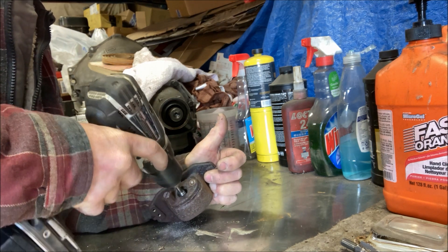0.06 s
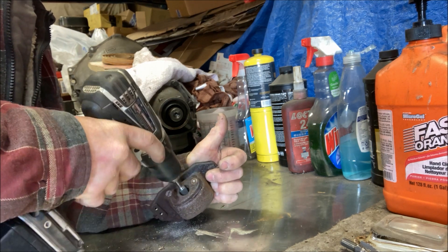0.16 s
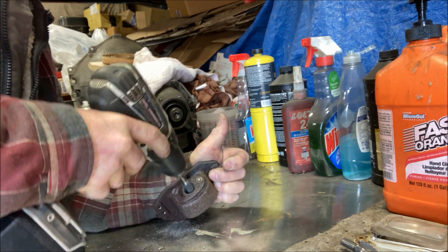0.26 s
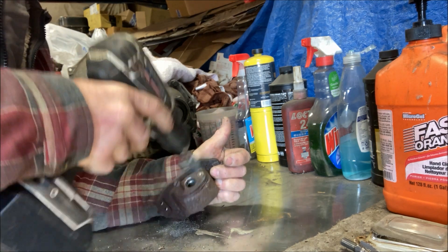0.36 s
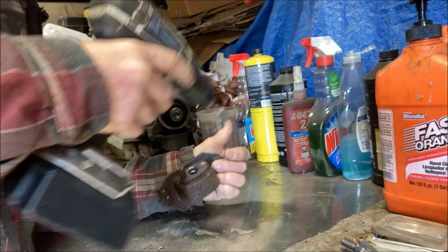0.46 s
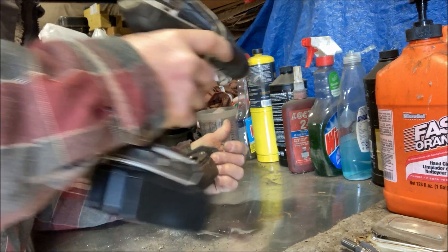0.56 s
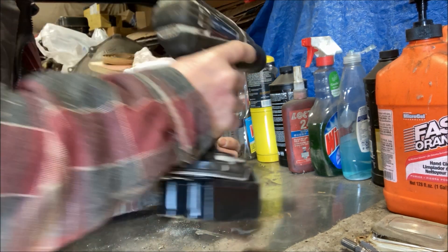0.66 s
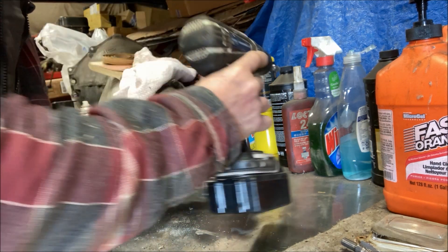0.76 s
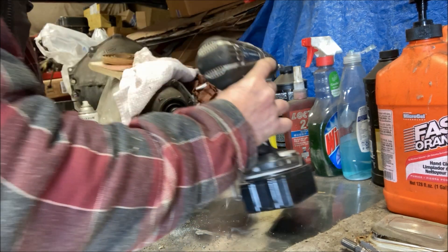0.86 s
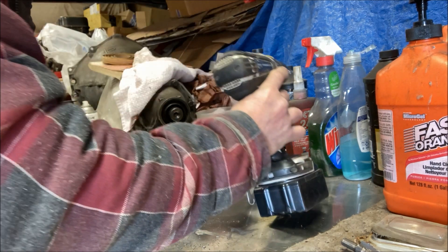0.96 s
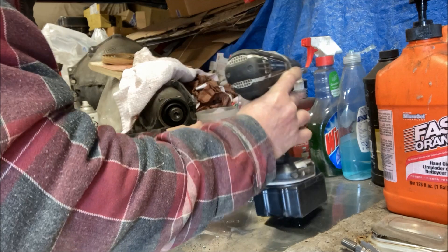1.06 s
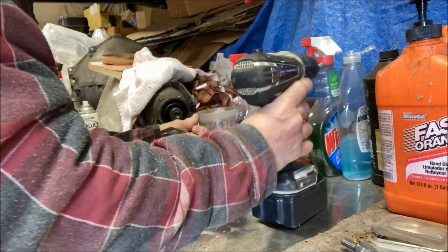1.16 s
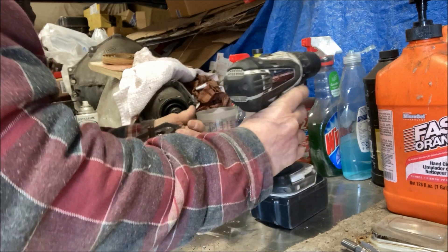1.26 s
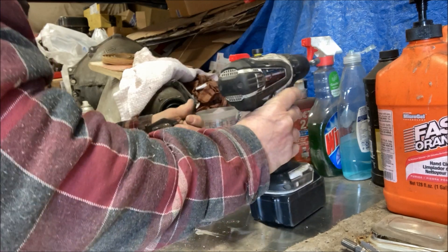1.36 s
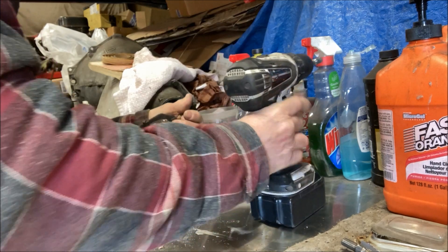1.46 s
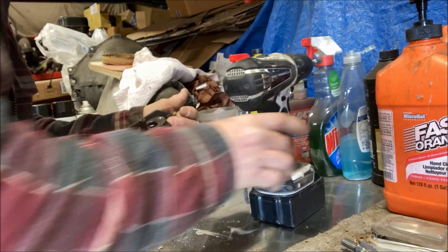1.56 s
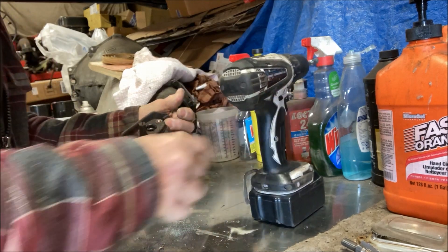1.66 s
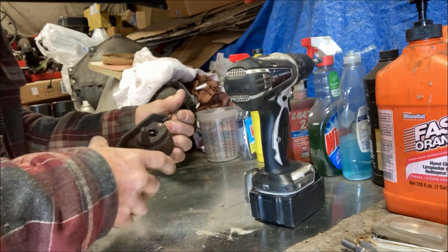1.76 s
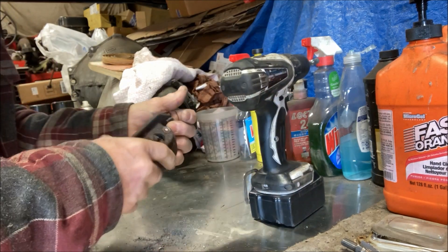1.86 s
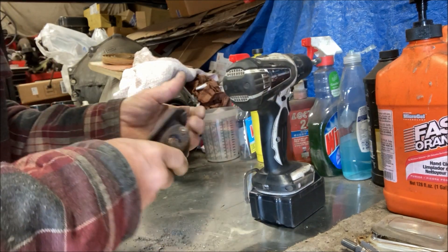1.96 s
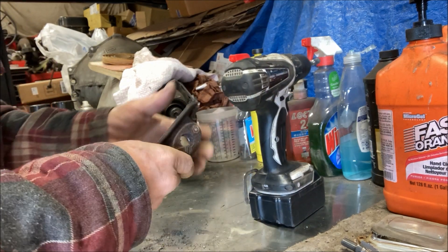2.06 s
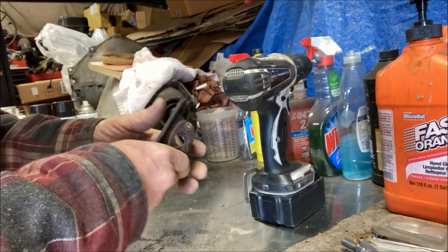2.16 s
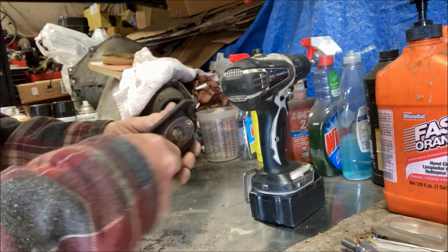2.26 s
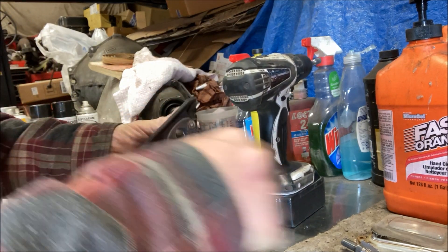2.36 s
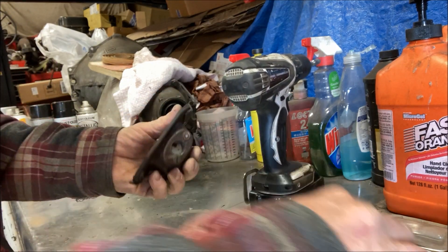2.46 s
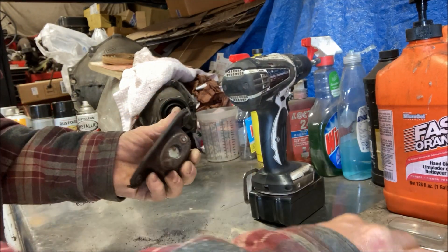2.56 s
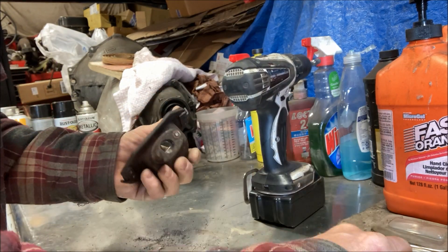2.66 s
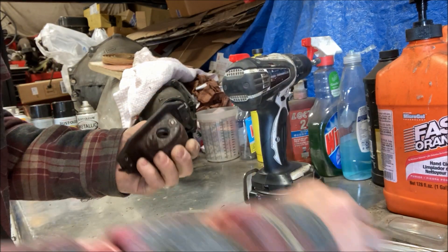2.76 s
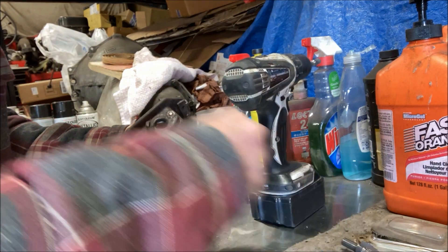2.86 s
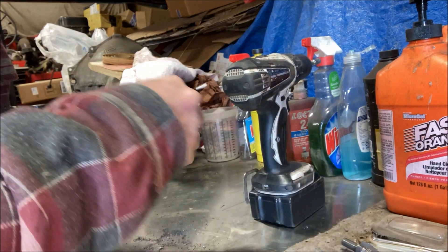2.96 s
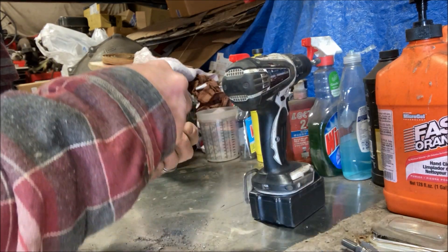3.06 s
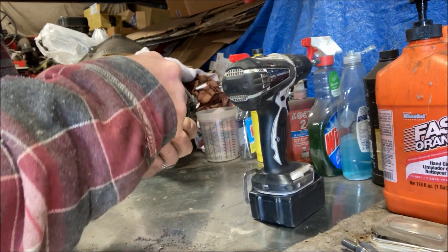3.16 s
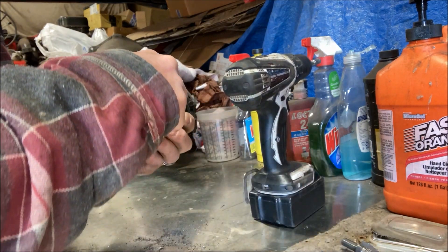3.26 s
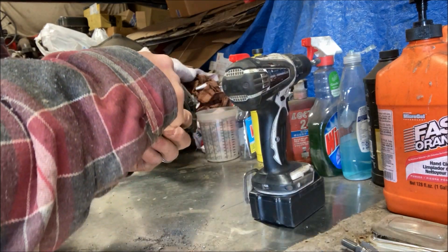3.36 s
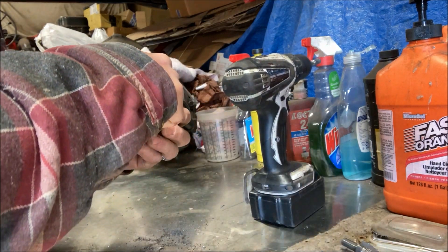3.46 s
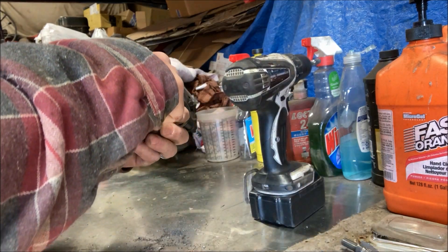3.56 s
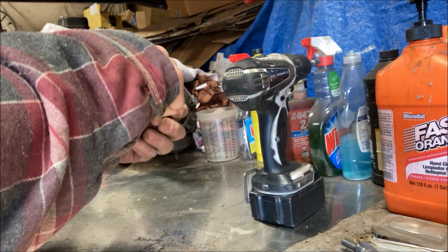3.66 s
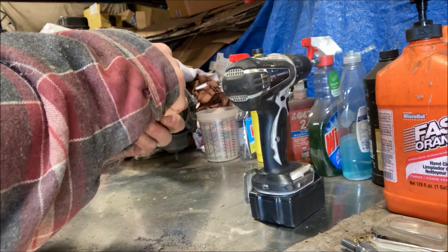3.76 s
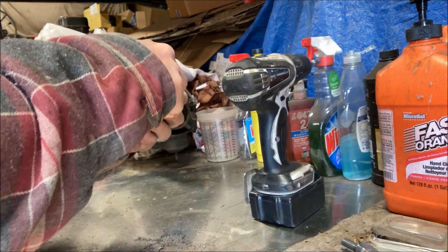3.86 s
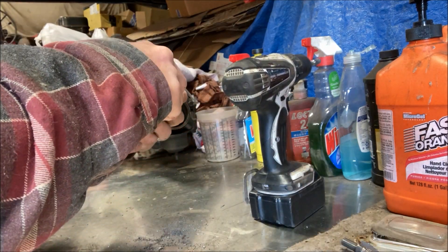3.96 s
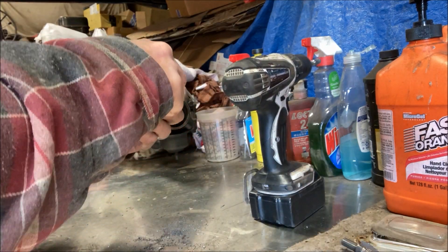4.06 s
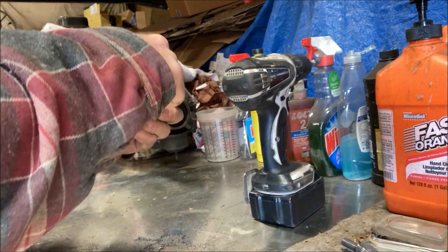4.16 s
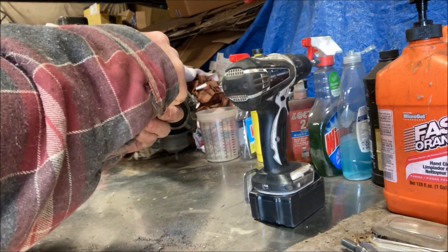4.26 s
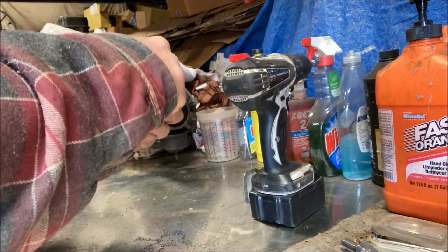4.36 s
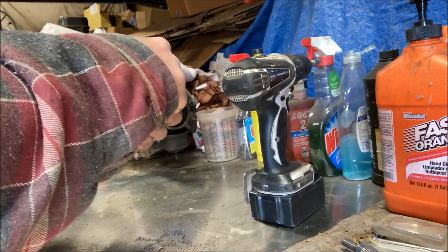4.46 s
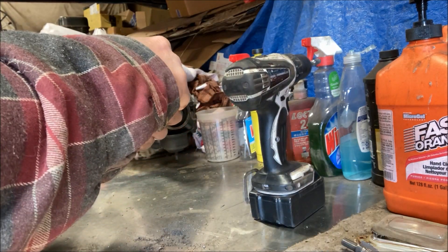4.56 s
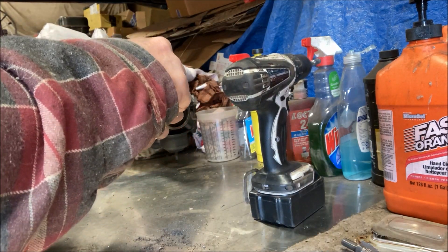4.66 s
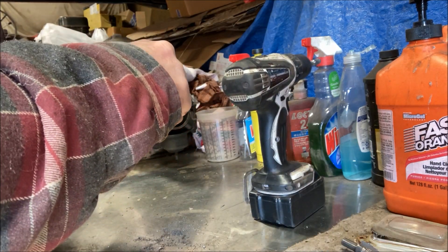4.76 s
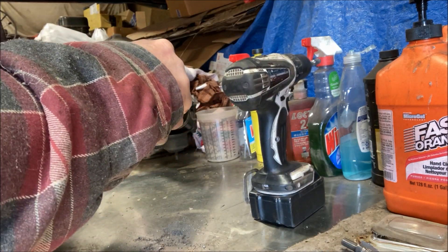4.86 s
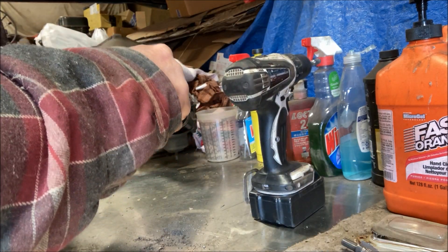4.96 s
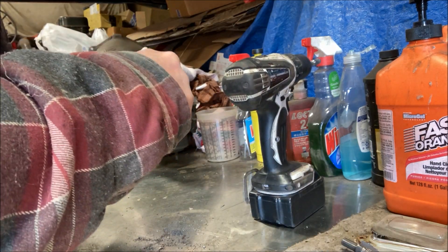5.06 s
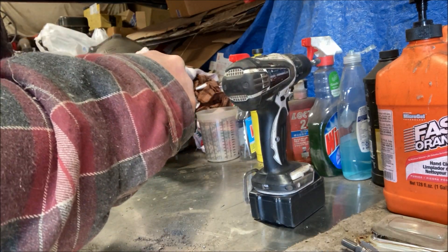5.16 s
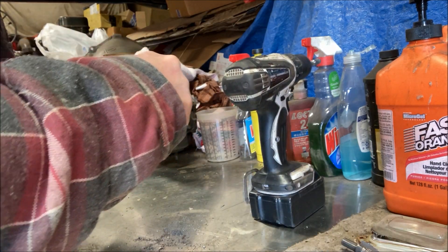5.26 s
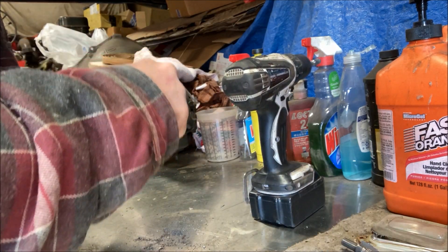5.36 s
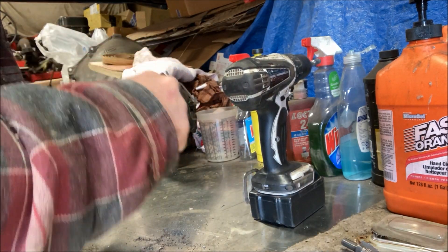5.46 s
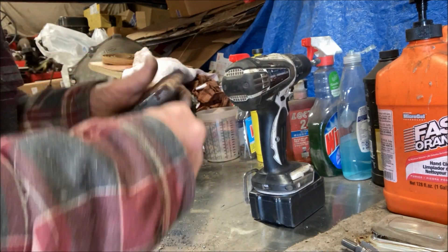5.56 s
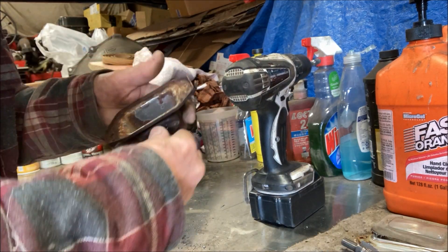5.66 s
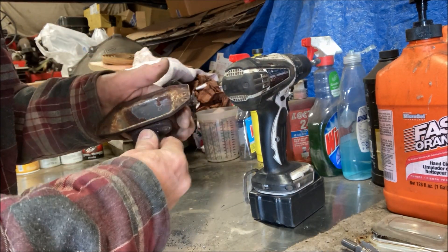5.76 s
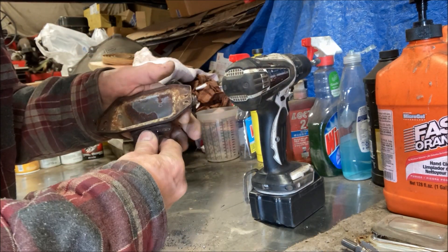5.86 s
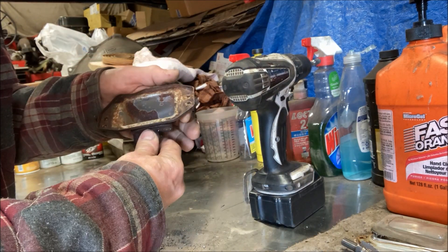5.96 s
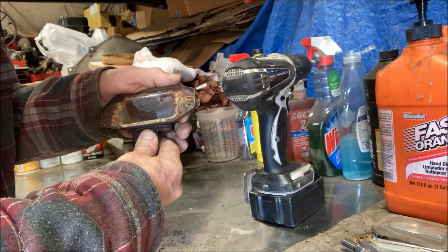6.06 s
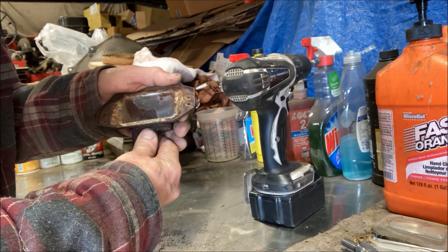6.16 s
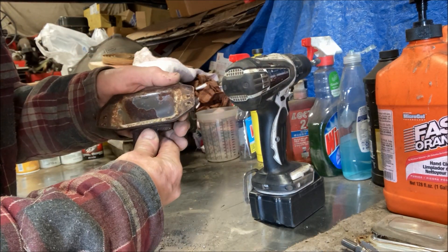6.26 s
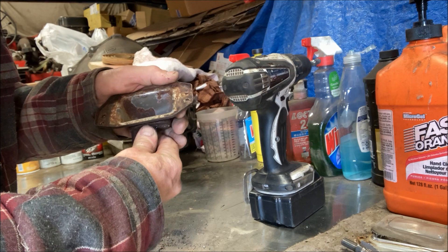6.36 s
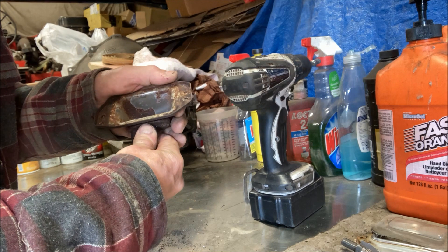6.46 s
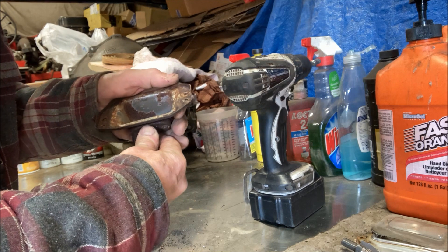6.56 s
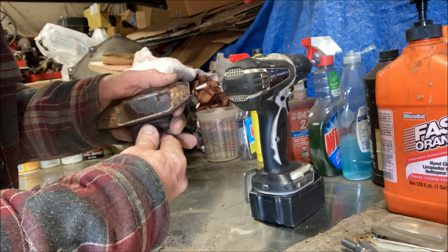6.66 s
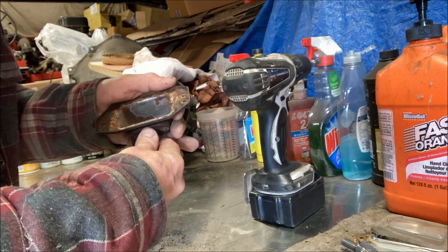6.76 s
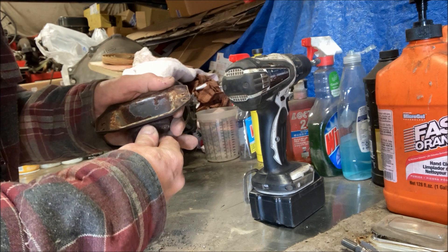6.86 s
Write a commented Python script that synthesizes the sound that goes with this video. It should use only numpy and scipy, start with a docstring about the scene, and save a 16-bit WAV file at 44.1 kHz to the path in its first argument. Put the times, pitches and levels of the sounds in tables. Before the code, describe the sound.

A power tool grinds steel harshly for half a second, clacks to a stop, then is set down, rocking with quickening knocks on a metal bench.

```python
"""Cordless drill on a steel plate

A close two-port microphone hears a burr grind a steel plate: shaped noise with a motor whine of sines.
The drill brakes with clacks of noise, then stands rocking on a metal-topped bench: decaying modes and noise.
Hands turn the plate over with clicks and grainy rubs, a sleeve swishes, and the workshop adds a faint hush."""
import sys
import numpy as np
from scipy import signal
from scipy.fft import rfft, irfft, next_fast_len
from scipy.io import wavfile
from scipy.ndimage import uniform_filter1d, map_coordinates

SR = 44100
rng = np.random.default_rng(int(sys.argv[2]) if len(sys.argv) > 2 else 0)


def transcribe(signal):
    """Save signal, clipped to [-1, 1], as a 16-bit WAV file at the path in sys.argv[1]."""
    frames = np.atleast_2d(signal).T
    limited = np.clip(frames, -1, 1)
    pcm = np.round(limited * 32767).astype(np.int16)
    wavfile.write(sys.argv[1], SR, pcm)


N = 304271
TIME = np.arange(N) / SR  # seconds


def grinding(cut_db=-24.5, cut_follow=0.14, chatter_db=0, plate_db=-33, grain_db=3.0, skip_db=1.5,
             skip_hz=40, repeat=0.4, jitter=0.0023, lift_s=0.4637, coast_s=0.02):
    """The burr tears chips from the steel, skips in the hand and shakes tool and plate; the motor whines."""
    # motor speed: time_s, speed_turns_per_s
    speed_curve = [(0, 245), (.06, 246), (.17, 251.5), (.23, 250), (.3, 245), (.39, 245.5), (.44, 233),
                   (.48, 222)]
    # how hard the burr bites into the steel: time_s, bite_db
    bite_curve = [(0, 0), (.21, -1), (.335, 7), (.4, -1), (.45, -8)]
    # level of the tool's chatter: time_s, level_db
    shake_curve = [(0, -23), (.225, -31.5), (.32, -26.5), (.41, -25), (.455, -41.5)]
    # the burr catches and jolts the tool: middle_s, rise_db above the steady chatter
    jolt_rows = [(.012, 5), (.096, 5.5), (.135, 5.5), (.168, 10.5), (.398, 5)]
    # spectrum of the cutting hiss: frequency_hz, level_db
    cut_bands = [(25, -24.5), (45, -12.5), (80, 3.5), (140, -10.5), (450, -1), (800, -6), (2000, -8),
                 (3000, -8.5), (4500, -3), (6200, -9.5), (9000, -3.5), (12000, -9.5), (15500, -16)]
    # resonances of the chattering tool: frequency_hz, width_hz, level_db
    chatter_modes = [(77, 25, -12), (141, 60, -15), (232, 17, 5.5), (269, 39, 2), (330, 13, -9),
                     (427, 14, -12), (481, 14, -6.5), (580, 22, -11.5), (652, 8.9, -13)]
    # resonances of the steel plate: frequency_hz, width_hz, level_db
    plate_modes = [(1010, 50, -2), (1075, 65, 5), (1190, 40, -8), (1360, 130, 5), (1750, 100, -10)]
    # how loudly the housing radiates a motor tone of each pitch: frequency_hz, level_db
    housing = [(2200, -39.5), (2480, -34.5), (3400, -39), (3590, -33), (3770, -47), (4500, -52),
               (4900, -42.5), (5030, -34.5)]
    # motor tones: cycles_per_turn
    whine_orders = [10, 15, 20]

    chips = noise(.7)
    size = chips.shape[1]
    t = TIME[:size]
    speed = np.interp(t, *np.transpose(speed_curve))
    bite = np.interp(t, *np.transpose(bite_curve))
    shaking = np.interp(t, *np.transpose(shake_curve))
    turns = np.cumsum(speed * (1 + jitter * wander(size, 90))) / SR
    skip = wander(size, skip_hz)

    # the same roughness comes round every turn
    roughness = rng.standard_normal(size=180)
    teeth = map_coordinates(roughness, [turns % 1 * 180], mode="grid-wrap")
    chips = chips * gain_of(grain_db * wander(size, 5000))
    cutting = coloured(patchy(chips + repeat * teeth, depth_db=3.6), cut_bands)
    hiss = gain_of(cut_db + cut_follow * bite + 0.27 * skip) * cutting

    jolts = sum(db * np.exp(-((t - s) / 0.009) ** 2) for s, db in jolt_rows)
    shaken = resonate(chips * gain_of(jolts + skip_db * skip), chatter_modes)
    shake = gain_of(chatter_db + shaking) * shaken
    # the chips run backwards here, so the plate does not copy the chatter
    ring = gain_of(plate_db + bite) * resonate(chips[:, ::-1] * gain_of(1.5 * skip), plate_modes)

    flutter_db = 1.6 * wander(size, 120)
    slack = .0038 * wander(size, 150)  # turns; play in the bearings blurs the higher tones most
    whine = 0
    for k in whine_orders:
        level = gain_of(read(housing, k * speed) + flutter_db) * np.sqrt(2)
        whine = whine + level * np.sin(2 * np.pi * k * (turns + slack))

    lifted = np.maximum(t - lift_s, 0)  # seconds since the burr left the steel
    sound = (hiss + ring + whine) * np.exp(-lifted / coast_s) + shake * np.exp(-lifted / .008)
    return np.pad(sound, ((0, 0), (0, N - size)))


def brake():
    """As the motor brakes, gears and chuck slam against their play and rebound."""
    # slams: start_s, level_db
    slams = [(.460, -25.5), (.4762, -13), (0.4798, -23), (0.4998, -24), (.503, -25), (.568, -50)]
    # spectrum of a slam: frequency_hz, level_db
    slam_bands = [(100, -29.5), (300, -1.5), (600, -13), (1100, 2), (1700, -3), (2600, -2.5), (4000, -9),
                  (6000, -14.5), (9000, -13.5), (15500, -18)]
    out = np.zeros((2, N))
    for s, db in slams:
        add(out, s, gain_of(db) * snap(slam_bands, 0, crack_s=0.0019, tail_db=-21, tail_s=0.029))
    return out


def rocking(knock_db=0, wash_db=-2, tick_db=1, vary_db=3, detune=0.029, fresh=0.81, swell_s=0.0049,
            roll_db=-17, roll_s=0.021):
    """Each landing rings the case and bench modes, a little differently every time, with a hard tick."""
    # modes of battery case and bench top: frequency_hz, level_db, t60_s
    bench_modes = [(189, -21.5, 0.26), (227.9, -7, 0.15), (266, -16, 0.44), (341.7, -10.5, 0.16),
                   (495, -10.5, 0.055), (609.3, -11, 0.052), (795, -3, 0.021), (945.5, -6.5, 0.067),
                   (1066, -7, 0.03), (1620, -6.5, 0.028), (2033, -8, 0.036), (2463, -17, .03),
                   (2860, -18, 0.024)]
    # spectrum of their dense wash of modes: frequency_hz, level_db
    wash_bands = [(40, -7), (100, -1.5), (260, -0.5), (600, 0), (950, -7.5), (1300, -7.5), (1700, -8.5),
                  (2500, -12), (4500, -26), (7000, -32.5), (15000, -45)]
    # decay of that wash: frequency_hz, t60_s
    wash_t60 = [(60, 0.53), (260, 0.23), (600, .17), (1500, 0.11), (4000, 0.065), (12000, 0.22)]
    # spectrum of the hard tick before its tilt: frequency_hz, level_db
    tick_bands = [(500, -19.5), (2000, -9), (4000, -3), (6500, -5), (12000, 4.5), (15500, -6.5)]

    out, t, usual = np.zeros((2, N)), TIME[:SR // 2], noise(.5)
    for s, db, hard_db, fine_db, _ in landings():
        chance = rng.standard_normal((len(bench_modes), 2))
        modes = 0
        for k, ((hz, level, t60), (more, off)) in enumerate(zip(bench_modes, chance)):
            fade = gain_of(level + vary_db * more - 60 * t / t60)
            modes = modes + (-1) ** k * fade * np.sin(2 * np.pi * hz * (1 + detune * off) * t)
        # part of the wash is common to all landings, part is fresh
        wash = dying(coloured(usual + fresh * noise(.5), wash_bands), wash_t60)
        wash = wash * (1 - np.exp(-t / swell_s))
        add(out, s, gain_of(db + knock_db) * (peaked(modes) + gain_of(wash_db) * peaked(wash)))
        tilt_db = .5 * (fine_db - hard_db)
        tick = snap(tick_bands, tilt_db, crack_s=0.0028, tail_db=-10, tail_s=0.03)
        add(out, s, gain_of(db + hard_db + tick_db) * tick)

    for s, db, *_ in landings()[2:]:  # once it stands, the base rolls and scuffs into each landing
        scuff = np.exp(-t[::-1] / roll_s) * coloured(noise(.5), wash_bands)
        add(out, s - .5, gain_of(db + roll_db) * scuff)
    return out


def landings():
    """Lists every landing of the battery: each rocking swing is shorter and weaker than the last."""
    # single knocks on the bench: start_s, level_db, hard_db (tick relative to the knock),
    # fine_db (half its excess over hard_db tilts the tick, dB per octave), weight_db (boom, likewise relative)
    single_knocks = [(1.083, -22.5, -4, -24, -10), (1.1, -27, -4, -21, 7.5), (1.164, -30, -8, -34, -16.5),
                     (1.276, -35.5, -14, -13, -11.5), (1.325, -28.5, -4.5, -30, -2),
                     (1.427, -34, -8, -21, 6), (2.725, -53, -19.5, -17, -5),
                     (2.941, -53.5, -10.5, -28, -11)]
    # rocking onto a padded edge and a hard edge in turn, later a wobble on one edge: first_s, until_s,
    # first_gap_s, gap_ratio (each gap over the one before), first_level_db, hard_db, fine_db (both as above)
    rock_series = [(1.553, 2.5, .27, .867, -36.5, -27, -33), (1.709, 2.62, .252, .877, -36.5, -8, -27),
                   (3.205, 5.46, .28, .929, -58.5, -12, -21)]
    force_power = 1.8  # a landing's force goes with the length of its swing to this power
    rock_boom_db = -1  # weight_db of a rocking landing

    rows = list(single_knocks)
    for first, until, gap, ratio, db, hard_db, fine_db in rock_series:
        swing = ratio ** np.arange(16)
        times = first + gap * (np.cumsum(swing) - swing)
        levels = db + force_power * 20 * np.log10(swing)
        for s, level in zip(times, levels):
            if s < until:
                rows.append((s, level, hard_db, fine_db, rock_boom_db))
    return rows


def bench(boom_db=7, tremble_db=-14, tremble_t60=1.4):
    """Landings boom the bench and set its frame trembling; an arm bumps it and loose steel pings."""
    # an arm bumps the bench: start_s, level_db (before boom_db)
    arm_bump = (2.753, -34.5)
    # a loose bit of steel rings: start_s, pitch_hz, level_db, t60_s
    steel_pings = [(1.435, 4110, -47.5, 0.24)]
    # spectrum of the frame's tremble: frequency_hz, level_db
    tremble_bands = [(18, -11.5), (35, 1), (60, -2.5), (120, -12.5), (260, -8.5), (500, -23.5), (1500, -42),
                     (5000, -73.5)]

    out, power, t = np.zeros((2, N)), np.zeros((1, N)), TIME[:SR // 2]
    tremble = gain_of(-60 * TIME / tremble_t60) * np.minimum(TIME / .015, 1)
    for s, db, _, _, weight_db in landings():
        add(out, s, gain_of(db + weight_db + boom_db) * boom(hz=76, t60=.15, rise_s=.011))
        add(power, s, (gain_of(db + tremble_db) * tremble) ** 2)
    bump_s, bump_db = arm_bump
    add(out, bump_s, gain_of(bump_db + boom_db) * boom(hz=76, t60=0.21, rise_s=0.016))
    for s, hz, db, t60 in steel_pings:
        add(out, s, gain_of(db - 60 * t / t60) * np.sin(2 * np.pi * hz * t))
    return out + np.sqrt(power) * coloured(noise(N / SR), tremble_bands)


def boom(hz, t60, rise_s):
    """The bench's lowest mode swells and dies."""
    t = TIME[:SR // 2]
    return gain_of(-60 * t / t60) * (1 - np.exp(-(t / rise_s) ** 2)) * np.sin(2 * np.pi * hz * t)


def handling():
    """Fingers tap the plate and slide over it as they turn it."""
    # fingers click on the plate: start_s, level_db, tilt_db_per_octave, ring_hz
    finger_clicks = [(1.211, -49, 13, 11600), (3.4765, -40.5, 2, 3600), (3.497, -49, 0, 5200),
                     (3.6643, -53.5, 3, 3440), (4.248, -45, 2, 2253), (4.261, -42.5, 0, 2271),
                     (5.528, -62.5, 4, 5000), (5.724, -54, 3, 2820), (6.344, -54, 6, 4900),
                     (6.394, -61.5, 2, 5170), (6.787, -51.5, 0, 1900)]
    # skin and sleeves slide over steel: middle_s, level_db, half_length_s, tilt_db_per_octave, squeak_hz
    slides = [(0.577, -45, 0.0099, -3.5, 1950), (1.639, -51.5, 0.052, -1.5, 2340),
              (2.383, -53, 0.031, -3.5, 12700), (2.427, -47, 0.016, -1, 6000),
              (2.792, -55, .04, -4.5, 4540), (3.583, -56.5, 0.024, -5.5, 2156),
              (3.77, -66.5, 0.125, -9.5, 3260), (4.253, -58, .016, -.5, 2260),
              (5.672, -59, .045, -0.5, 950), (5.767, -56, .03, 0, 4780)]
    out = np.zeros((2, N))
    for s, db, tilt_db, hz in finger_clicks:
        add(out, s, gain_of(db) * click(tilt_db, hz))
    for s, db, half_s, tilt_db, hz in slides:
        add(out, s - .5, gain_of(db) * rub(half_s, tilt_db, hz))
    return out


def click(tilt_db, hz, crack_s=.0026, tail_db=-14, tail_s=.015, ring_db=12):
    """A fingertip taps the steel, which rings briefly in the hand."""
    # spectrum of a tap before its tilt: frequency_hz, level_db
    tap_bands = [(300, -27.5), (800, -27), (1500, -7), (2200, -4.5), (3500, -13.5), (5000, -17.5),
                 (7000, -21), (10000, -28.5), (15500, -35.5)]
    return snap(tap_bands, tilt_db, crack_s, tail_db, tail_s, hz, ring_db)


def rub(half_s, tilt_db, hz, grain_db=3, catch_db=2.2, squeak_db=8.5):
    """Skin or cloth slides over the steel in a grainy swell, centred in one second."""
    # spectrum of a slide before its tilt: frequency_hz, level_db
    slide_bands = [(100, -12), (300, 1), (700, -13), (1000, -6), (1500, -7), (2500, -4.5), (3500, -3.5),
                   (4700, -5), (6300, -9.5), (9000, -5), (12500, -8), (15500, -14)]
    grains = noise(1) * gain_of(grain_db * wander(SR, 2500) + catch_db * wander(SR, 150))
    squeaky = ringing(patchy(grains, depth_db=4), hz, width_hz=200, db=squeak_db)
    slide = coloured(squeaky, slide_bands, tilt_db)
    return np.exp(-((TIME[:SR] - .5) / half_s) ** 2) * slide


def fidgeting(count=3, slide_db=-8, vary_db=2):
    """Light touches fall at random through each spell: a tiny bright tick inside a short slide."""
    # spells in which the fingers shift their grip: from_s, until_s, level_db
    spells = [(1.22, 1.62, -55), (2, 2.5, -63), (3.5, 3.902, -64), (4.45, 5.15, -73), (6.45, 6.801, -69)]
    out = np.zeros((2, N))
    for start, until, db in spells:
        for k, (place, strength, pitch) in enumerate(rng.random((count, 3))):
            s = start + (until - start) * (k + place) / count
            hz = 4500 + 7500 * pitch
            gain = gain_of(db + vary_db * (2 * strength - 1))
            add(out, s, gain * click(tilt_db=8, hz=hz))
            add(out, s - .5, gain * gain_of(slide_db) * rub(half_s=0.027, tilt_db=-1, hz=hz))
    return out


def sleeve(grain_db=2):
    """Flannel swishes softly as the arm carries the drill across."""
    # one sweep of the sleeve: middle_s, level_db, half_length_s
    sweep = (.82, -59.5, 0.21)
    # spectrum of the cloth: frequency_hz, level_db
    cloth_bands = [(100, 0), (300, 4), (700, -3.5), (1400, -2.5), (2800, -5), (4500, -10), (6500, -16),
                   (9000, -13.5), (12500, -16.5), (15500, -28)]
    s, db, half_s = sweep
    out = np.zeros((2, N))
    fibres = noise(1) * gain_of(grain_db * wander(SR, 2000))
    swell = np.exp(-((TIME[:SR] - .5) / half_s) ** 2)
    add(out, s - .5, gain_of(db) * swell * coloured(fibres, cloth_bands))
    return out


def hush(level_db=-67.5):
    """The quiet workshop is a steady bed of shaped noise."""
    # spectrum of the quiet workshop: frequency_hz, level_db
    hush_bands = [(12, -44.5), (20, -13.5), (54, -3), (90, -10.5), (129, -8.5), (565, -26), (1540, -30.5),
                  (1980, -33), (8640, -40), (10200, -42.5), (12400, -38.5), (13900, -52.5), (15500, -41.5)]
    return gain_of(level_db) * coloured(noise(N / SR), hush_bands)


def workshop(x, wet_db):
    """The cluttered room answers with a short, weak tail."""
    # decay of the room: frequency_hz, t60_s
    room_t60 = [(100, 0.82), (500, 0.44), (2000, 0.36), (6000, 0.32), (14000, 0.39)]
    tail = dying(noise(.5), room_t60) * np.clip(TIME[:SR // 2] / 0.011, 0, 1)
    tail = tail / np.linalg.norm(tail[0])
    return x + gain_of(wet_db) * signal.fftconvolve(x, tail, axes=1)[:, :N]


def ports(x, leftness):
    """Two close ports hear nearly the same bass; higher up they differ in phase and level."""
    # the microphone ports: frequency_hz, likeness_0_to_1, left_louder_db (at leftness 1)
    port_table = [(60, 0.83, -2), (260, 0.9, -1), (600, 0.4, -1), (1200, 0, 6), (2510, 0.4, 3),
                  (3900, 0.1, 5.5), (5050, 0.4, 0.5), (6492, 0.6, 2.5), (8450, .92, -0.5), (15000, 1, 0.5)]
    # phase between them: frequency_hz, left_lag_radians
    port_lag = [(0, 0), (900, 0), (2300, -3.1), (3800, -3.2), (4500, -5.5), (16000, 12.5)]
    size = next_fast_len(N + 4096)
    hz = np.fft.rfftfreq(size, 1 / SR)
    a, b = rfft(x, size)
    same = np.clip(read(port_table, hz), 0, 1)
    mid = (a + b) * np.sqrt(1 + same) / 2
    side = (a - b) * np.sqrt(1 - same) / 2
    # each port takes half of the level and phase difference
    lean = gain_of(leftness * read(port_table, hz, axis=2) / 2)
    lean = lean * np.exp(-.5j * np.interp(hz, *np.transpose(port_lag)))
    return irfft(np.array([(mid + side) * lean, (mid - side) / lean]), size)[:, :N]


def snap(spectrum, tilt_db, crack_s, tail_db, tail_s, ring_hz=2600, ring_db=-20):
    """A hard contact: a short crack, then a weaker rattle of many modes, one of which may stand out."""
    burst = coloured(ringing(noise(1 / 8), ring_hz, width_hz=230, db=ring_db), spectrum, tilt_db)
    t = TIME[:burst.shape[1]]
    return peaked(burst * (np.exp(-t / crack_s) + gain_of(tail_db) * np.exp(-t / tail_s)))


def patchy(x, depth_db):
    """As the contact point shifts, bands a few hundred hertz wide come and go."""
    z = signal.stft(x, SR, nperseg=512)[2]
    patches = rng.standard_normal(z.shape[1:])
    patches = uniform_filter1d(patches, size=4, axis=0)  # across frequency
    patches = evened(uniform_filter1d(patches, size=7, axis=1))  # across time
    return signal.istft(z * gain_of(depth_db * patches), SR, nperseg=512)[1][:, :x.shape[1]]


def ringing(x, hz, width_hz, db):
    """Lifts one resonance out of x."""
    return x + gain_of(db) * signal.lfilter(*signal.iirpeak(hz, hz / width_hz, SR), x)


def resonate(x, modes):
    """Passes x through parallel resonances (hz, width_hz, level_db); rms 1."""
    total = 0
    for hz, width, db in modes:
        total = total + gain_of(db) * signal.lfilter(*signal.iirpeak(hz, hz / width, SR), x)
    return evened(total)


def dying(x, t60s):
    """Lets each band of x die at its own speed."""
    hz, t, z = signal.stft(x, SR, nperseg=256)
    fade = gain_of(-60 * t / read(t60s, hz)[:, None])
    return signal.istft(z * fade, SR, nperseg=256)[1][:, :x.shape[-1]]


def coloured(x, spectrum, tilt_db=0):
    """Gives x a spectrum, tilted above 1 kHz by dB per octave; rms 1."""
    hz = np.fft.rfftfreq(x.shape[-1], 1 / SR)
    slope = tilt_db * np.log2(np.maximum(hz, 1000) / 1000)
    return evened(irfft(rfft(x) * gain_of(read(spectrum, hz) + slope), x.shape[-1]))


def noise(seconds):
    """Two unrelated channels of white noise."""
    return rng.standard_normal((2, round(seconds * SR)))


def wander(size, hz):
    """Slow chance of rms 1, up to about hz."""
    f = np.fft.rfftfreq(size, 1 / SR)
    lowpass = np.exp(-(f / hz) ** 2) * (f > 0)
    return evened(irfft(rfft(rng.standard_normal(size)) * lowpass, size))


def gain_of(db):
    """Decibels to gain."""
    return 10 ** (np.asarray(db) / 20)


def evened(x):
    """Scales to rms 1."""
    return x / np.sqrt(np.mean(x ** 2) + 1e-20)


def peaked(x):
    """Scales so that the loudest 4 ms have rms 1."""
    return x / np.sqrt(uniform_filter1d(np.atleast_2d(x ** 2).mean(0), size=176).max())


def read(points, hz, axis=1):
    """Reads a column of a table on a log-frequency axis."""
    table = np.transpose(points)
    return np.interp(np.log(hz + 1), np.log(table[0] + 1), table[axis])


def add(mix, s, sound):
    """Mixes a sound in at time s."""
    part = mix[:, max(round(s * SR), 0):][:, :sound.shape[-1]]
    part += sound[..., :part.shape[1]]


def scene():
    """Tool and hands share one placing at the ports; bench and hush share one with less lean."""
    hands = workshop(grinding() + brake() + sleeve() + handling() + fidgeting(), wet_db=-21.0)
    table = workshop(bench() + rocking(), wet_db=-17.0)
    return ports(hands, leftness=0.97) + ports(table + hush(), leftness=0.77)


def record(dry):
    """The microphone's low cut and the recorder's band limit."""
    low_cut_hz, edge_hz = 29, 15900
    low_cut = signal.butter(4, low_cut_hz, "high", fs=SR, output="sos")
    thin = signal.sosfilt(low_cut, dry)
    band_limit = signal.firwin(511, edge_hz, window=("kaiser", 9), fs=SR)
    return signal.oaconvolve(thin, band_limit[None], "same")


dry = scene()
out = record(dry)
transcribe(out)
```